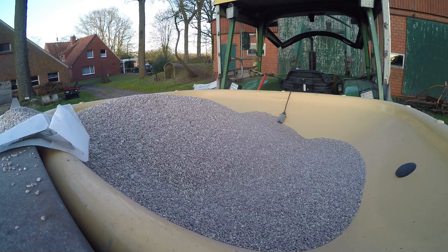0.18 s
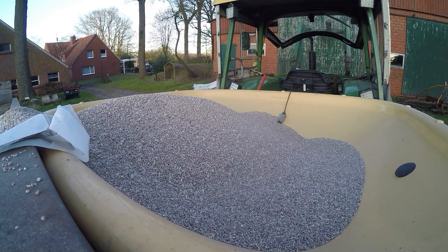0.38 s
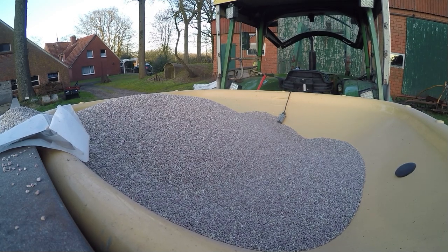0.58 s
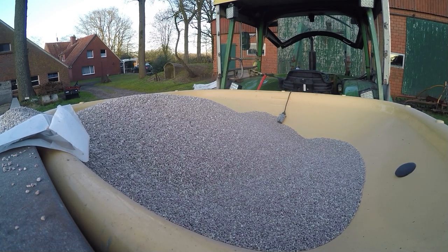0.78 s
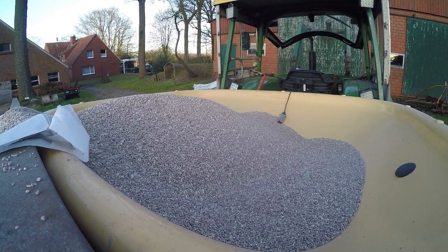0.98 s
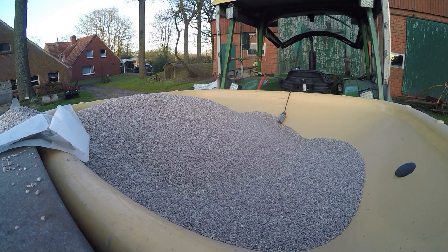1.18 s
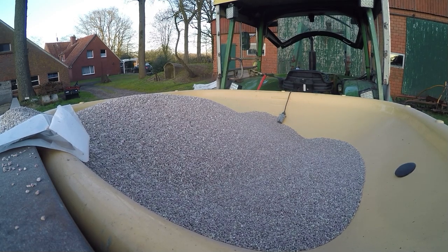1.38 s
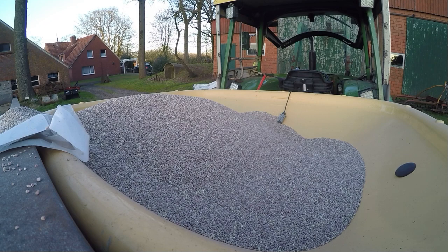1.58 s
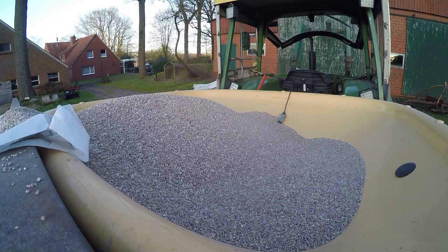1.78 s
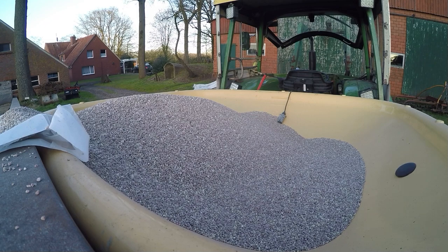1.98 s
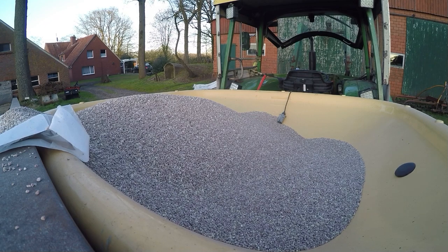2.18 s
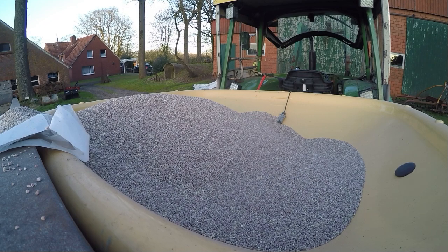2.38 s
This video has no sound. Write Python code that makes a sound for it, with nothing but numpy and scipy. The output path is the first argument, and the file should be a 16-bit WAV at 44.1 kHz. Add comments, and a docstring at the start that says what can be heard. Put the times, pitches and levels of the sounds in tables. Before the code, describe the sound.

A shovel blade knocks and rasps into dry granules in three short bursts, the plastic hopper booming dully and grains hissing after each; close microphone, quiet farmyard with faint birds behind.

```python
"""In a yard, a shovel blade knocks on a hard surface in three goes and is pushed rasping into a heap of granules.
Knocks are bursts of noise plus the ringing blade; the rasp is dense random slips that ring the same blade.
The granules hiss as they slide and trickle off, made of thousands of tiny ticks.
The plastic hopper booms along in shaped noise, with thuds of fading sines.
Behind lie soft yard noise, stray ticks, a faint hanging tone and gliding sines for birds."""
import sys
import numpy as np
from scipy import signal
from scipy.io import wavfile

SR = 44100
rng = np.random.default_rng(int(sys.argv[2]) if len(sys.argv) > 2 else 0)


def boost_factor(decibels):
    """Convert a level in decibels to a linear amplitude factor."""
    exponent = np.asarray(decibels, float) / 20
    return 10 ** exponent


def unload_audio(sound):
    """Save the sound as a 16-bit wav file, at the path given as the first command line argument."""
    columns = np.transpose(np.atleast_2d(sound))
    # keep every value between -1 and 1, then stretch to whole-number steps
    steps = np.round(np.clip(columns, -1, 1) * 32767)
    wavfile.write(sys.argv[1], SR, steps.astype(np.int16))


N = 105840
T = np.arange(N) / SR
EDGES = 25 * 2 ** np.arange(0, 9.4, 1 / 3)   # edges of the third-octave bands, Hz

# Colour of the yard noise. Each row: frequency in Hz, relative level in dB per Hz.
YARD_COLOUR = [(25, 3), (60, 6), (120, -4.7), (250, -14), (400, -18.5), (1000, -18.5), (2500, -23.5),
               (5000, -29.5), (7500, -38.5), (15700, -41.5)]
# Yard noise throughout, before its gain; its level points lie mostly between the pushes.
# Each row: time in seconds, level in dB.
YARD_LEVEL = [
    [(0.0, -56), (0.16, -46.5), (0.206, -50), (0.215, -48.5)],
    [(0.7, -50), (0.912, -57), (0.974, -59.5), (0.985, -56)],
    [(1.5, -51.5), (1.624, -57.5), (1.736, -53), (1.74, -45)],
]
# A faint tone that hangs on from late in the first push.
# The row: start in seconds, starting level in dB, pitch in Hz, time to fall 60 dB in seconds.
HANGING_TONE = (.5, -46, 462, 1.4)
# Far bird notes. Each row: start in seconds, length in seconds, rms level in dB, start pitch in Hz, end pitch in Hz.
BIRD_NOTES = [(.075, .014, -59, 3300, 3700), (.108, .024, -58, 3800, 3250), (.685, .03, -61, 3600, 3250),
              (.735, .035, -64, 3300, 2800), (.93, .025, -70, 5600, 5400), (.96, .015, -67, 3450, 3350)]
# Squeaks of the blade edge. Each row: start in seconds, length in seconds, level in dB, pitch in Hz.
EDGE_SQUEAKS = [(.298, 0.014, -48, 5650), (1.809, 0.0075, -40, 7250)]
# Hopper booming, one list per push, before its gain. Each row: time in seconds, level in dB.
BOOM_LEVEL = [
    [(0.25, -26), (0.276, -46), (0.326, -37), (0.378, -7.5), (0.42, -11.5), (0.512, -16), (0.54, -24),
     (0.78, -54.5), (0.8, -50)],
    [(1.03, -21), (1.05, -17), (1.092, -29), (1.124, -15), (1.152, -26), (1.162, -14), (1.324, -19.5),
     (1.356, -32), (1.6, -60)],
    [(1.8, -25.5), (1.924, -24.5), (1.954, -15), (2.022, -25), (2.084, -16), (2.13, -17), (2.188, -43),
     (2.27, -65), (2.4, -48.5)],
]
# Colour of the boom. Each row: frequency in Hz, relative level in dB per Hz.
HOPPER_COLOUR = [(15, -44), (25, -54), (48, 12), (81, -0.5), (150, 7), (259, 4.5), (291, -6.5), (348, -11),
                 (420, 4), (550, -15), (920, -120)]
# Dull thuds on the hopper. Each row: start in seconds, starting level in dB, pitch in Hz.
HOPPER_THUDS = [(.245, -9.5, 224), (.432, 4.5, 129.6), (1.122, 5, 153), (1.172, -0.5, 188),
                (1.954, -32, 160)]
# Sliding granules, before their gain. Each row: time in seconds, level in dB, lift above 8500 Hz in dB.
HISS_LEVEL = [
    [(0.25, -64, -2), (0.334, -45.5, -2), (0.346, -28.5, -1.5), (0.484, -24, -9), (0.524, -30, 1),
     (0.564, -30, 9.7), (0.696, -56.5, -4), (0.82, -77, -5), (0.876, -61, -1), (0.98, -68, -2)],
    [(1.04, -50, 3), (1.088, -25, -7), (1.196, -21.5, -8), (1.212, -32, 0.1), (1.222, -21.5, -5),
     (1.308, -31, 5), (1.55, -75.5, -8), (1.652, -79, 0.1), (1.73, -54, 4)],
    [(1.79, -33, -7), (1.824, -60, -3), (1.832, -40, -4), (1.876, -36, 0.1), (1.938, -26.5, -1),
     (1.948, -30.5, 0.1), (1.986, -23, -0.8), (2.12, -39, 5), (2.15, -45, 2), (2.28, -73, 5)],
    [(2.28, -62, 4), (2.328, -42.5, -1), (2.374, -32.5, -6), (2.4, -38, -6)],
]
# Colour of the granules. Each row: frequency in Hz, relative level in dB per Hz.
GRANULE_COLOUR = [(290, -78), (500, -33), (667, 11), (749, 6.5), (1660, 0), (2950, 2.5), (5170, 0.5),
                  (10300, -14), (15700, -18.5)]
# Rasp in each push, before its gain. Each row: time in seconds, level in dB, lift of the modes near 1000 Hz in dB.
PUSH_LEVEL = [
    [(0.27, -68, 3), (0.284, -41, 2), (0.332, -33.5, 11), (0.352, -15.5, 8.5), (0.36, -16, -3),
     (0.486, -13.5, -10), (0.52, -16, 6), (0.572, -45, 7), (0.66, -83, 0.1)],
    [(1.04, -31, 0.1), (1.068, -36, 3), (1.088, -15, -3.5), (1.274, -15.5, 4.5), (1.34, -38, -4),
     (1.5, -61, -4)],
    [(1.8, -4, 7), (1.812, -33.5, 8), (1.838, -20.5, -3), (1.888, -24.5, 2), (1.914, -17.5, 1.5),
     (2.028, -17, 12), (2.098, -21.5, 5.9), (2.186, -44, -3), (2.27, -84, 0.1)],
]
# Colour of the broad rasp. Each row: frequency in Hz, relative level in dB per Hz.
RASP_COLOUR = [(120, -111), (200, -7), (425, -10), (497, -3.5), (795, -10), (957, 1), (1430, -5),
               (6000, -24), (7800, -68), (13200, -120)]
# Ringing modes of the blade. Each row: frequency in Hz, relative level in dB, time to fall 60 dB in seconds
# (the last as knocks ring it; the rasp rings a little longer).
BLADE_MODES = [(295, -3, .12), (425, -6, .1), (560, -8, .08), (660, -7, .08), (746, -9, .07), (960, 0, .07),
               (1060, -3, .07), (1210, -6, .08), (1345, -6, .08), (1525, -9, .08), (1685, -9, .08),
               (1855, -8, .08), (2125, -10, .06), (2300, -13, .06), (2620, -11, .06), (3375, -10, .028),
               (4100, -15, .02), (4850, -10, .02), (5950, -12, .015), (7500, -22, .01)]
# Blade knocks. Each row: start in seconds, level in dB before the gain, rise in seconds, length factor,
# bass tilt in dB, treble tilt in dB, favoured mode in Hz, its lift in dB, lift of the modes above 3000 Hz in dB.
KNOCK_EVENTS = [(0.062, -49, 0.0017, .5, -8, 12, 2120, 0.1, .1),
                (.145, -24, 0.0017, 1.05, -0.5, -15.5, 1100, -13, -3),
                (.218, -8.5, 0.0027, 1.23, 2.5, -11, 1340, 3, -15),
                (.301, -36.5, 0.0023, 0.73, -5, -9, 1060, 3, 2),
                (0.343, -9.5, 0.0052, 0.65, 0.1, -11.5, 960, -13, 0),
                (0.991, -6, 0.0042, 1.43, 6.1, -5.5, 960, 6, 1.5),
                (1.744, -9, 0.0087, 2.35, -4, -6, 3375, 8.5, 14),
                (1.823, -17.5, 0.0086, 1.86, -33, 4, 2580, 10.5, 7)]
# Colour of the knock bursts. Each row: frequency in Hz, relative level in dB per Hz.
KNOCK_COLOUR = [(50, -18), (275, -1.5), (600, -16.5), (1000, -4), (2000, -2.5), (3500, -5), (6000, -13),
                (9000, -51), (15500, -63)]
# Dying away of the bursts at length factor 1. Each row: frequency in Hz, time to fall 60 dB in seconds.
KNOCK_FALL = [(60, 0.1), (300, 0.3), (1000, 0.13), (3000, 0.065), (8000, 0.021), (15000, .05)]


def rms_one(x):
    """Scale to rms 1."""
    return x / np.sqrt(np.mean(x ** 2) + 1e-20)


def at_hz(points, hz):
    """Read a table on a log-frequency axis."""
    points = np.array(points)
    return np.interp(np.log(hz), np.log(points[:, 0]), points[:, 1])


def gain_in_time(tables):
    """Add up the gains of several level curves, each faded in and out over 20 ms."""
    out = np.zeros(N)
    for rows in tables:
        s, db = np.transpose(rows)
        # a curve that reaches the end of the sound is not faded out
        end = s[-1] + .02 * (s[-1] > T[-1] - .01)
        fade = np.clip(np.minimum(T - s[0], end - T) / .02, 0, 1)
        out += fade * boost_factor(np.interp(T, s, db))
    return out


def lift_in_time(tables):
    """Read the lift in dB, the third column, over the whole time."""
    s, _, lift_db = np.concatenate(tables).T
    return np.interp(T, s, lift_db)


def levels_only(tables):
    """Keep the time and level columns."""
    return [np.array(rows)[:, :2] for rows in tables]


def drift(rate):
    """Slow random wander of rms 1, smoothed at a rate in Hz and computed on every 40th sample."""
    r = np.exp(-80 * np.pi * rate / SR)
    slow = signal.lfilter([1], [1, -2 * r, r * r], rng.standard_normal(N // 40 + 2002))[2000:]
    return np.interp(np.arange(N) / 40, np.arange(len(slow)), rms_one(slow))


def clicks(per_s, spread_db):
    """Random clicks of uneven size and either sign; rms 1."""
    size = boost_factor(spread_db * np.minimum(rng.exponential(1, N), 5)) * rng.choice([-1, 1], N)
    struck = rng.random(N) < per_s / SR
    return rms_one(size * struck + 1e-9)


def ring(x, hz, t60):
    """A resonance: a unit click sets a fading sine of height 1 ringing."""
    r = boost_factor(-60 / (t60 * SR))
    w = 2 * np.pi * hz / SR
    return signal.lfilter([0, np.sin(w)], [1, -2 * r * np.cos(w), r * r], x + 1e-18)


def bands(two):
    """Third-octave bands, dealt in turn from two unrelated signals: (centre Hz, band)."""
    out = []
    for k, (lo, hi) in enumerate(zip(EDGES, EDGES[1:])):
        sos = signal.butter(2, [lo, hi], "band", fs=SR, output="sos")
        out.append((np.sqrt(lo * hi), signal.sosfilt(sos, two[k % 2])))
    return out


def coloured(two, spectrum, patchy_db, rate):
    """Bands weighted by a spectrum, each flickering partly together and partly alone; rms 1."""
    shared = drift(rate)
    out = np.zeros(N)
    for hz, band in bands(two):
        if spectrum[0][0] <= hz <= spectrum[-1][0]:
            flicker_db = patchy_db * (.6 * shared + drift(rate))
            out += boost_factor(at_hz(spectrum, hz) + flicker_db) * band
    return rms_one(out)


def yard_noise():
    """Soft background noise, coloured by frequency and following its level curve."""
    gain_db = 7
    s, db = np.concatenate(YARD_LEVEL).T
    noise = coloured(rng.standard_normal((2, N)), YARD_COLOUR, patchy_db=0.06, rate=32.0)
    return boost_factor(np.interp(T, s, db) + gain_db) * noise


def hanging_tone():
    """One faint sine that fades slowly while its level wavers."""
    start, top_db, hz, t60 = HANGING_TONE
    level_db = top_db - 60 * (T - start) / t60 + 1.5 * drift(12.)
    return (T > start) * boost_factor(level_db) * np.sin(2 * np.pi * hz * T)


def stray_granules():
    """Stray granules tick down: each click rings one of eight short resonances."""
    per_s, level_db, cycles = 46, -47.5, 16   # cycles: how many the ringing takes to fall 60 dB
    stray = (rng.random(N) < per_s / SR) * rng.uniform(.3, 1, N)
    dealt = rng.integers(0, 8, N)
    ticks = np.zeros(N)
    for k, hz in enumerate(np.geomspace(1500, 5500, 8)):
        ticks += ring(stray * (dealt == k), hz, cycles / hz)
    return boost_factor(level_db) * ticks


def birds():
    """Short bird notes: sines that glide in pitch while they swell and fade."""
    out = np.zeros(N)
    for s, length, db, hz0, hz1 in BIRD_NOTES:
        u = np.clip((T - s) / length, 0, 1)
        cycles = length * (hz0 * u + (hz1 - hz0) * u * u / 2)
        out += 2 * boost_factor(db) * np.sin(np.pi * u) * np.sin(2 * np.pi * cycles)
    return out


def hopper():
    """The hopper: a lumpy boom of low noise during the pushes, and round thuds of fading sines."""
    thud_t60_s = 0.026
    boom = coloured(rng.standard_normal((2, N)), HOPPER_COLOUR, patchy_db=1.2, rate=19.0)
    out = gain_in_time(BOOM_LEVEL) * boost_factor(-5.67) * boom
    for s, db, hz in HOPPER_THUDS:
        t = np.maximum(T - s, 0)
        rise = np.minimum(t * hz * 4, 1)   # over a quarter cycle
        out += boost_factor(db - 60 * t / thud_t60_s) * np.sin(2 * np.pi * hz * t) * rise
    return out


def granules():
    """Thousands of tiny ticks blur into a hiss, and harder grains ping briefly; the top has its own lift."""
    grains_per_s, grain_spread_db, gain_db = 8900, 3.5, 2
    pings_per_s, ping_cycles, ping_db = 900, 45, -6
    ticks = [clicks(grains_per_s, grain_spread_db) for _ in range(2)]
    hiss = coloured(ticks, GRANULE_COLOUR, patchy_db=1.87, rate=47.0)
    hard = clicks(pings_per_s, 4.7)
    dealt = rng.integers(0, 30, N)   # which of 30 pitches each hard grain rings
    pings = np.zeros(N)
    for k, hz in enumerate(np.geomspace(1800, 11000, 30)):
        pings += boost_factor(at_hz(GRANULE_COLOUR, hz)) * ring(hard * (dealt == k), hz, ping_cycles / hz)
    hiss = rms_one(hiss + boost_factor(ping_db) * rms_one(pings))
    top = signal.sosfilt(signal.butter(2, 8500., "high", fs=SR, output="sos"), hiss)
    low = signal.sosfilt(signal.butter(2, 8500., "low", fs=SR, output="sos"), hiss)
    level = gain_in_time(levels_only(HISS_LEVEL)) * boost_factor(gain_db)
    # the minus keeps the two halves from cancelling where they meet
    return level * (low - top * boost_factor(lift_in_time(HISS_LEVEL)))


def squeaks():
    """Squeaks of the blade edge: noise through a narrow resonance, swelling and fading."""
    out = np.zeros(N)
    for s, length, db, hz in EDGE_SQUEAKS:
        swell = np.sin(np.pi * np.clip((T - s) / length, 0, 1))
        out += 2 * boost_factor(db) * swell * rms_one(ring(rng.standard_normal(N), hz, .009))
    return out


def rasp():
    """Dense slips under the blade: a broad rasp and the blade's modes, which come and go."""
    slips_per_s, slip_spread_db, sway_db, modes_db = 5500, 3.0, 4.5, -0.5
    slips = [clicks(slips_per_s, slip_spread_db) for _ in range(2)]
    modes = []
    for k, (hz, db, t60) in enumerate(BLADE_MODES):
        level_db = db + 3.0 * (hz > 4000) + sway_db * drift(16.0)
        modes.append(boost_factor(level_db) * ring(slips[k % 2], hz, 1.1 * t60))
    scale = np.sqrt(np.mean(sum(modes) ** 2))   # taken before the lift
    lift = lift_in_time(PUSH_LEVEL)
    ringing = sum(m * boost_factor(lift * (900 < hz < 1100)) for m, (hz, _, _) in zip(modes, BLADE_MODES)) / scale
    body = coloured(slips, RASP_COLOUR, patchy_db=1.5, rate=39.0) + boost_factor(modes_db) * ringing
    return gain_in_time(levels_only(PUSH_LEVEL)) * boost_factor(-2.0) * body


def knocks():
    """Each knock is a noise burst with its own decay per band, and a short chatter that rings the blade."""
    gain_db, modes_db = -5.5, -21
    shade_db, favour_width = 2, .07   # chance level of each mode; width of the favour in log frequency
    noise = bands(rng.standard_normal((2, N)))
    scale = np.sqrt(np.mean(sum(boost_factor(at_hz(KNOCK_COLOUR, hz)) * band for hz, band in noise) ** 2))
    chatter = clicks(2700, 2.2)
    shades = rng.normal(0, shade_db, (len(KNOCK_EVENTS), len(BLADE_MODES)))
    lowpass = signal.butter(6, 7800, fs=SR, output="sos")
    out = np.zeros(N)
    for knock, shade in zip(KNOCK_EVENTS, shades):
        s, db, rise_s, length, bass_db, treble_db, best_hz, lift_db, high_db = knock
        i = int(s * SR)
        t = T[:min(N - i, SR // 2)]
        here = slice(i, i + len(t))
        rise = np.minimum(t / rise_s, 1) ** 1.44
        after = np.maximum(t - rise_s, 0) / length   # time since the rise, stretched
        tilt = [(100, bass_db), (1000, 0.0031), (6000, treble_db), (14000, 1.2 * treble_db - 6.0)]

        burst = np.zeros(len(t))
        for hz, band in noise:
            fall_db = 60 * after / at_hz(KNOCK_FALL, hz)
            burst += boost_factor(at_hz(KNOCK_COLOUR, hz) + at_hz(tilt, hz) - fall_db) * band[here]

        drive = chatter[here] * rise * boost_factor(-60 * after / 0.037)
        modes = np.zeros(len(t))
        for (hz, mode_db, t60), chance_db in zip(BLADE_MODES, shade):
            favour_db = lift_db * np.exp(-(np.log(hz / best_hz) / favour_width) ** 2)
            level_db = mode_db + chance_db + at_hz(tilt, hz) + high_db * (hz > 3000) + favour_db
            modes += boost_factor(level_db) * ring(drive, hz, t60)
        modes = signal.sosfilt(lowpass, modes)
        out[here] += boost_factor(db + gain_db) * (rise * burst / scale + boost_factor(modes_db) * modes)
    return out


def scene():
    """All sources added up, one channel."""
    background = yard_noise() + hanging_tone() + stray_granules() + birds()
    shovelling = hopper() + granules() + squeaks() + rasp() + knocks()
    return (background + shovelling)[None, :]


def low_pass(x):
    """Removes everything above the highest recorded frequency."""
    return signal.sosfilt(signal.butter(12, 16080, fs=SR, output="sos"), x)


def record(dry):
    """Peaks are rounded off, then the extreme treble and bass are cut."""
    rounded = 1.213 * np.tanh(dry / 1.41)
    cut = signal.sosfilt(signal.cheby2(12, 60, 15950, fs=SR, output="sos"), rounded)
    mix = signal.sosfilt(signal.butter(2, 36., "high", fs=SR, output="sos"), cut)
    return low_pass(mix)


dry = scene()
out = record(dry)
unload_audio(out)
```